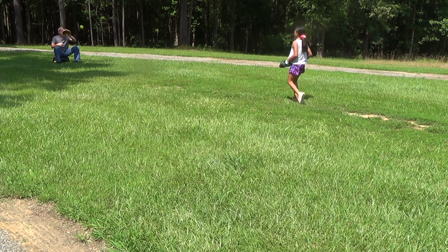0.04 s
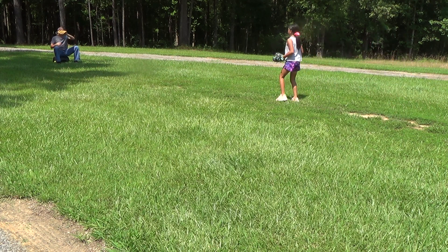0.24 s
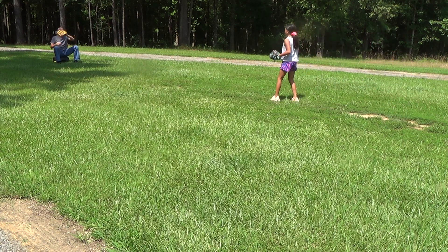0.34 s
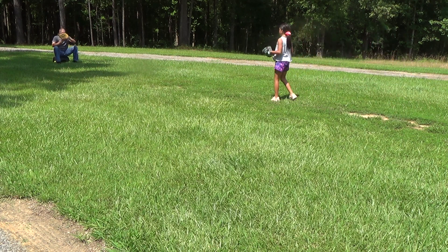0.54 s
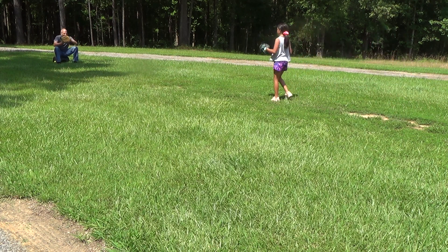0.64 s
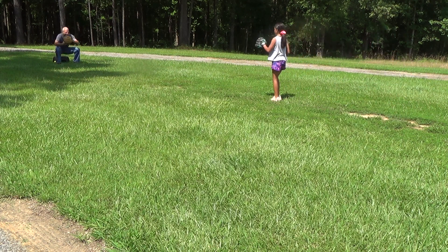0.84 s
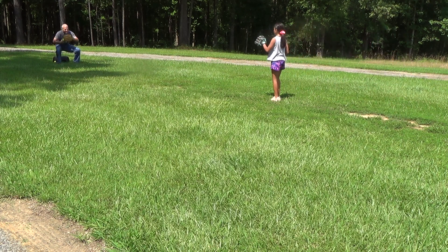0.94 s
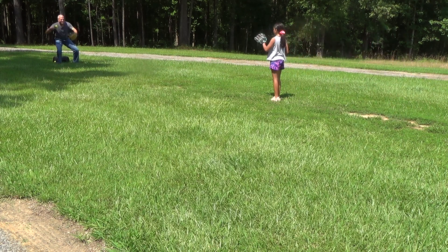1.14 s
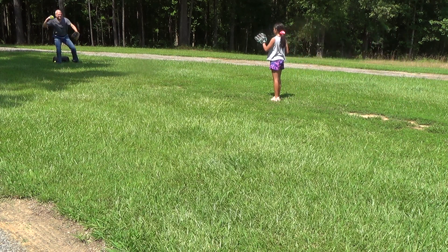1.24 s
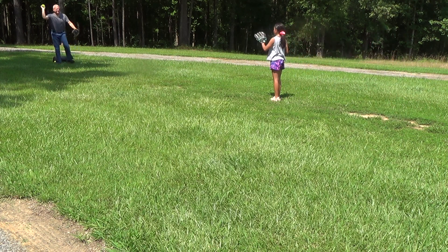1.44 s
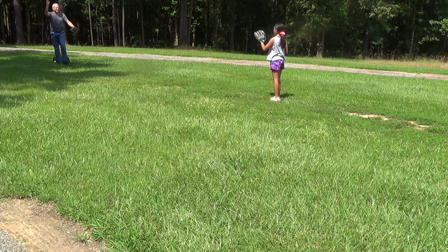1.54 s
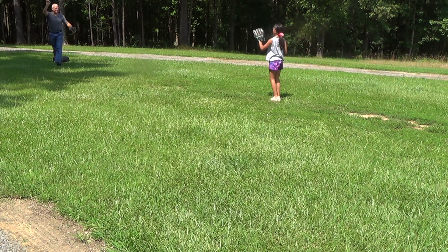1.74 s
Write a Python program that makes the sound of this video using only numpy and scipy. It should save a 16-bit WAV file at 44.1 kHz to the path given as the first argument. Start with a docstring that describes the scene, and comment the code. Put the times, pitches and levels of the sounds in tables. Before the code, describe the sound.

One sharp smack of a ball caught in a leather glove on a quiet lawn.

```python
"""A ball smacks into a leather glove on an open lawn, and the edge of the woods throws the smack back.
The impact excites damped modes of the leather and the padded pocket and squeezes out a crack of air.
Trunks return distinct echoes; grass and trees scatter the sound into a diffuse tail. Around it lie the
hush of still summer air, a far motor's drone, a faint insect trill and a few small rustles."""
import sys
import numpy as np
from scipy import signal
from scipy.fft import rfft, irfft
from scipy.io import wavfile

SR = 44100
rng = np.random.default_rng(int(sys.argv[2]) if len(sys.argv) > 2 else 0)


def persist_wave(psi):
    """Save psi, clipped to +-1, as 16-bit WAV."""
    counts = np.round(np.clip(psi, -1, 1) * 32767).astype(np.int16)
    wavfile.write(sys.argv[1], SR, np.atleast_2d(counts).T)


N = 79380

# the leather slaps shut in quick stages: start_s, level_db, brightness_hz, crack_db
GLOVE_CONTACTS = [(.20715, 12.5, 790, -50), (.20906, 2, 3860, -40.5), (.21008, 12, 2810, -36),
                  (.21116, 5.5, 2250, -38.5)]
# modes of the glove: pitch_hz, level_db, bandwidth_hz
LEATHER_MODES = [(943.5, 12.5, 58), (1230, -1.8, 205), (1538, -4.5, 130), (1710, -12, 140),
                 (2242, -2.5, 119), (2905, -4.3, 470), (3328, -2.5, 290), (5130, -17, 230),
                 (7150, -12, 1000), (8813, -6, 330), (10800, -4, 1270)]
POCKET_MODES = [(245, 14.9, 136), (382, 24.4, 110)]
# reflections: delay_s, level_db, smear_s, cutoff_hz
ECHO_PATHS = [(0.0259, -23.5, .0004, 2800), (.044, -35, 0.0057, 10000), (0.05, -28.5, 0.0058, 5500),
              (.0665, -27.5, 0.00033, 15000), (.075, -22, 0.0024, 1800), (0.083, -38, 0.0051, 5500),
              (.094, -27, 0.0031, 3480)]
# noise spectra: frequency_hz, relative_db
CRACK_SPECTRUM = [(500, -26), (1200, 10), (3500, 1), (6000, 0.5), (11000, -5.5), (14000, -15), (16000, -20)]
WOODS_SPECTRUM = [(60, -8), (200, 6.5), (500, -2), (1000, 1.5), (2800, 1), (4500, -6), (8000, -17),
                  (15000, -14)]
NEAR_SPECTRUM = [(80, 0), (250, 11.5), (1000, 5.5), (3000, 0.5), (6000, -10.5), (12000, -7), (16000, -22)]
AIR_SPECTRUM = [(25, -34), (50, -11), (70, -7), (88, -16), (130, -10.5), (175, -4), (215, -10), (310, -11),
                (560, -16), (900, -16.5), (1800, -21.5), (2700, -20), (3700, -23), (7000, -25.5),
                (9000, -24.5), (10500, -26.5), (13500, -27.5), (16000, -29)]
# reverberation time of the woods: frequency_hz, t60_s
WOODS_DECAY = [(100, 0.81), (1000, 1.74), (3000, 1.68), (6000, 1.22), (14000, 0.98)]
# level differences between the ears: frequency_hz, left_minus_right_db
CATCH_PAN = [(100, -10), (210, -14.5), (340, -10), (450, 3), (850, -1.5), (1600, 0), (4500, 0.5),
             (6000, 3.5), (13000, 1.4)]
TAIL_PAN = [(90, -19), (190, -16), (450, -6), (1000, -2.5), (2000, 1), (9000, 1.3)]
AIR_PAN = [(60, -5), (150, -11.5), (380, -1.5), (950, -1.5), (2380, -1.5), (5980, 0.5), (15000, -0.5)]
# width of the scattered sound: frequency_hz, side_db
SCATTER_WIDTH = [(200, -16), (1500, -23), (4000, -24), (6500, -0.5), (9000, -10), (14000, -32)]
# rustles and ticks: peak_s, level_db, half_length_s, centre_hz, spread_octaves
RUSTLE_EVENTS = [(0.022, -69, 0.036, 9000, 1.9), (0.037, -66.5, 0.022, 1520, 0.96),
                 (.436, -60, 0.0047, 1720, .5), (.696, -62, 0.0039, 3080, 0.51),
                 (1.504, -68.5, 0.0018, 11500, .2), (1.537, -73, .002, 11500, .2)]
# insect phrases: first_chirp_s, last_chirp_s, level_db
TRILL_PHRASES = [(.751, 1.085, -69.5), (1.149, 1.452, -70.5), (1.517, 1.685, -70.5), (1.75, 1.786, -69.5)]
# spectral lines of the motor: pitch_hz, half_width_hz, level_db, left_minus_right_db
MOTOR_LINES = [(61, 3.8, -88, -7), (179, 18, -79.5, -11.5), (898, 5.1, -87.5, -9)]
# likeness of the hush at the two ears: frequency_hz, correlation
AIR_COHERENCE = [(60, .16), (180, 0.71), (550, 0.85), (1650, 0.89), (3800, 1), (6000, 0.8), (10000, 0.92),
                 (14000, 1)]

CRACK_T60_S, CREAK_DB, CREAK_T60_S = 0.0048, -11.5, 0.035
THUD_S, THUD_SOFT_HZ = .21008, 163.4
ECHO_THUD_DELAY_S, ECHO_THUD_DB, ECHO_TREBLE_DB = .0742, -14, 8
WIDTH_DELAY_S, WIDTH_DB, WIDTH_CUTOFF_HZ = 0.00066, -20, 8000
WOODS_DB, WOODS_DELAY_S, WOODS_RISE_S = -56.5, 0.021, 0.027
NEAR_DB, NEAR_DELAY_S, GRASS_DB = -56, 0.036, -55
CHIRP_EVERY_S, CHIRP_S, CHIRP_HZ, CHIRP_FALL_HZ = .03335, 0.013, 2707, 50
CHIRP_WANDER, CHIRP_UNEVEN_DB = .008, .6
MOTOR_GROWTH_DB_PER_S, AIR_DB, BAND_EDGE_HZ = 2, -68, 15800


def leather_smack():
    """Impact excitation: each contact rings the leather's modes and squeezes out a crack of air."""
    blows = sum(amp(db) * delay(s) * resonance(hz, hz) for s, db, hz, _ in GLOVE_CONTACTS)
    radiation = low_cut(hz=1124, order=4)  # small flaps radiate little bass
    smack = irfft(blows * modal_response(LEATHER_MODES) * radiation, N)
    for start_s, _, _, crack_db in GLOVE_CONTACTS:
        crack = burst(start_s, 0.00011, CRACK_T60_S)
        creak = amp(CREAK_DB) * burst(start_s, 0.00054, CREAK_T60_S)
        smack += amp(crack_db) * (crack + creak) * noise(gains(CRACK_SPECTRUM))
    return smack


def pocket_thud():
    """Cushioned impact: padding softens the blow, which drives the pocket's low modes."""
    blow = delay(THUD_S) / (1 + 1j * bins() / THUD_SOFT_HZ) ** 2
    return irfft(blow * modal_response(POCKET_MODES) * low_cut(hz=113, order=2), N)


def smack_width(smack):
    """Stereo width: a faint, dull, delayed copy of the smack, opposite at the two ears, widens it."""
    path = amp(WIDTH_DB) * delay(WIDTH_DELAY_S) / (1 + (bins() / WIDTH_CUTOFF_HZ) ** 4)
    return irfft(rfft(smack) * path, N)


def tree_echoes(smack, thud):
    """Reflection: trunks and the edge of the woods return late, smeared, dulled copies of the catch."""
    paths = np.zeros(N // 2 + 1, complex)
    for delay_s, db, smear_s, cutoff_hz in ECHO_PATHS:
        taps = rng.standard_normal(N) * burst(delay_s, smear_s / 2, smear_s * np.log(1000))
        paths += amp(db) * rfft(taps / np.linalg.norm(taps)) / np.sqrt(1 + (bins() / cutoff_hz) ** 4)
    paths *= amp(ECHO_TREBLE_DB * abs(low_cut(hz=5500, order=4)))  # leaves return treble more strongly
    thud_echo = amp(ECHO_THUD_DB) * rfft(thud) * delay(ECHO_THUD_DELAY_S)
    return irfft(rfft(smack) * paths + thud_echo, N)


def foliage_scatter():
    """Diffuse scattering: deep woods, nearest trees and grass each leave a decaying tail of noise."""
    start_s = GLOVE_CONTACTS[-1][0]
    hz, t, bands = signal.stft(noise(gains(WOODS_SPECTRUM)), SR, nperseg=256)
    decay = amp(-60 * np.maximum(t - start_s - WOODS_DELAY_S, 0) / curve(WOODS_DECAY, hz)[:, None])
    rise = np.minimum(since(start_s + WOODS_DELAY_S) / WOODS_RISE_S, 1)
    woods = amp(WOODS_DB) * rise * signal.istft(bands * decay, SR, nperseg=256)[1][:N]
    near_trees = amp(NEAR_DB) * burst(start_s + NEAR_DELAY_S, rise_s=0.029, t60_s=0.39)
    grass = amp(GRASS_DB) * burst(start_s, rise_s=0.0023, t60_s=0.19)
    return woods + (near_trees + grass) * noise(gains(NEAR_SPECTRUM))


def rustles():
    """Amplitude modulation: bell-shaped envelopes turn bands of noise into brief scuffs and ticks."""
    t = np.arange(N) / SR
    scuffs = np.zeros(N)
    for peak_s, db, half_length_s, hz, octaves in RUSTLE_EVENTS:
        band = np.exp(-.5 * (np.log2((bins() + 1) / hz) / octaves) ** 2)
        scuffs += amp(db) * np.exp(-((t - peak_s) / half_length_s) ** 2) * noise(band)
    return scuffs


def insect_trill():
    """Stridulation: evenly spaced wing strokes each sound a short falling tone."""
    trill = np.zeros(N)
    for first_s, last_s, db in TRILL_PHRASES:
        for stroke in range(round((last_s - first_s) / CHIRP_EVERY_S) + 1):
            t = np.arange(N) / SR - first_s - stroke * CHIRP_EVERY_S
            on = abs(t) < CHIRP_S / 2
            position = t[on] / CHIRP_S
            loud, sharp = rng.standard_normal(2)
            hz = CHIRP_HZ * (1 + CHIRP_WANDER * sharp) - CHIRP_FALL_HZ * position
            envelope = amp(db + CHIRP_UNEVEN_DB * loud) * np.cos(np.pi * position)
            trill[on] += envelope * np.sin(2 * np.pi * np.cumsum(hz) / SR)
    return trill


def motor_drone():
    """Narrow-band noise is heard as wavering tones: a far motor, slowly growing louder."""
    lines = sum(amp(db) * pan(pan_db)[:, None] * noise(1 / (1 + ((bins() - hz) / half_width) ** 4))
                for hz, half_width, db, pan_db in MOTOR_LINES)
    return lines * amp(MOTOR_GROWTH_DB_PER_S * (np.arange(N) - N / 2) / SR)


def air_hush():
    """Partial coherence: the steady outdoor hush is only partly alike at the two ears."""
    left, independent = rfft(rng.standard_normal((2, N)))
    coherence = np.clip(curve(AIR_COHERENCE, bins()), -1, 1)
    right = coherence * left + np.sqrt(1 - coherence ** 2) * independent
    spectra = np.array([left, right]) * gains(AIR_SPECTRUM) * pan(curve(AIR_PAN, bins()))
    return amp(AIR_DB) * unit_rms(irfft(spectra, N))


def amp(db):
    """Amplitude ratio of a level in decibels."""
    return 10 ** (np.asarray(db) / 20)


def unit_rms(x):
    """Normalisation to rms 1."""
    return x / np.sqrt(np.mean(x ** 2) + 1e-20)


def bins():
    """Fourier frequencies of a full-length spectrum."""
    return np.fft.rfftfreq(N, 1 / SR)


def curve(points, hz):
    """Interpolation along log frequency."""
    frequency, value = np.transpose(points)
    return np.interp(np.log(hz + 1), np.log(frequency + 1), value)


def gains(points):
    """Magnitude response from a table of levels."""
    return amp(curve(points, bins()))


def since(start_s):
    """Elapsed seconds, zero before the start."""
    return np.maximum(np.arange(N) / SR - start_s, 0)


def noise(gain):
    """Spectral shaping of white noise, at rms 1."""
    return unit_rms(irfft(rfft(rng.standard_normal(N)) * gain, N))


def burst(start_s, rise_s, t60_s):
    """Exponential decay after a linear rise."""
    t = since(start_s)
    return np.minimum(t / rise_s, 1) * amp(-60 * np.maximum(t - rise_s, 0) / t60_s)


def resonance(hz, bandwidth_hz):
    """Response of a damped oscillator, gain 1 at its centre."""
    f = bins() + 1e-6
    return 1 / (1 + 1j * (f * f - hz * hz) / (f * bandwidth_hz))


def modal_response(modes):
    """Superposition: a body responds as the sum of its modes."""
    return sum(amp(db) * resonance(hz, bandwidth_hz) for hz, db, bandwidth_hz in modes)


def low_cut(hz, order):
    """Maximally flat high-pass response."""
    return signal.freqs(*signal.butter(order, hz, "high", analog=True), bins())[1]


def delay(seconds):
    """A delay is a phase lag proportional to frequency."""
    return np.exp(-2j * np.pi * bins() * seconds)


def pan(db):
    """Interaural level difference as left and right gains of mean 1."""
    pair = amp(np.array([db / 2, -db / 2]))
    return pair / pair.mean(0)


def placed(sound, balance):
    """Localisation by level difference at each frequency, with the deepest bass cut."""
    return irfft(rfft(sound) * pan(curve(balance, bins())) * low_cut(hz=65, order=3), N)


def scene():
    """Superposition of the direct catch, its reflections and the background."""
    smack, thud = leather_smack(), pocket_thud()
    # the side signal adds on the left and subtracts on the right
    side = irfft(rfft(foliage_scatter()) * gains(SCATTER_WIDTH), N) + smack_width(smack)
    tail = tree_echoes(smack, thud) + foliage_scatter() + np.array([side, -side])
    background = air_hush() + motor_drone() + insect_trill() + rustles()
    return placed(smack + thud, CATCH_PAN) + placed(tail, TAIL_PAN) + background


def record(dry):
    """Band limiting: a steep low-pass removes the highest treble."""
    low_pass = signal.firwin(511, BAND_EDGE_HZ, window=("kaiser", 9), fs=SR)
    return signal.oaconvolve(dry, low_pass[None], "same")


dry = scene()
out = record(dry)
persist_wave(out)
```